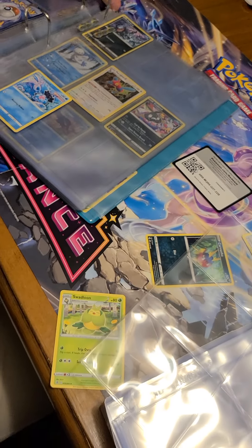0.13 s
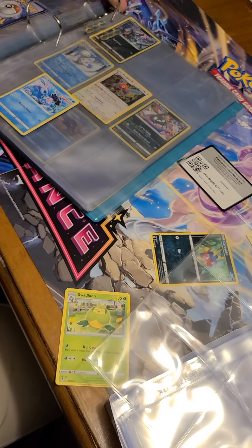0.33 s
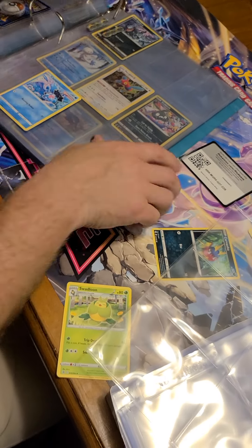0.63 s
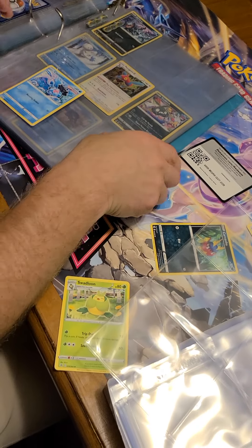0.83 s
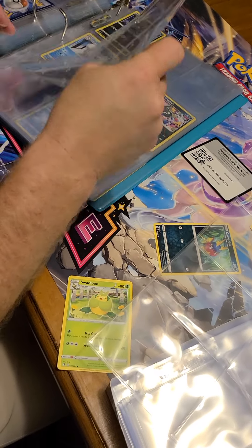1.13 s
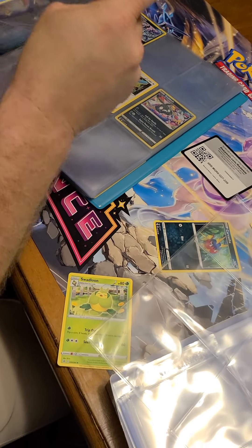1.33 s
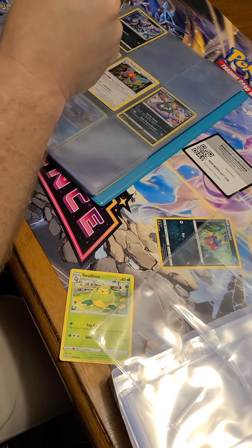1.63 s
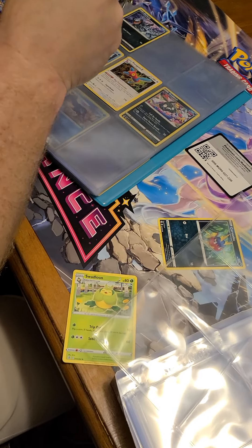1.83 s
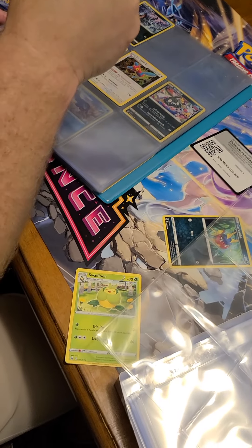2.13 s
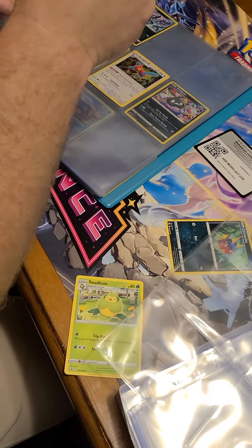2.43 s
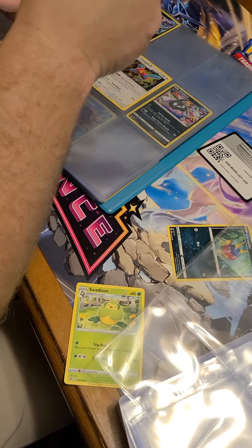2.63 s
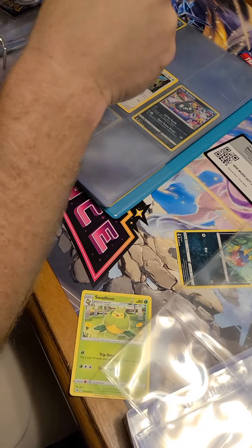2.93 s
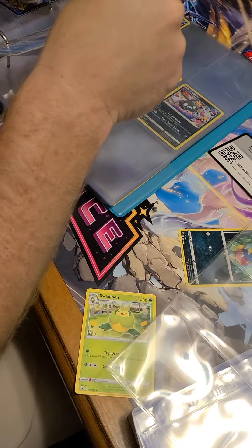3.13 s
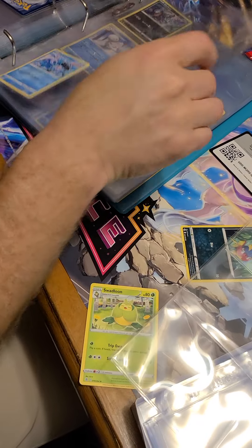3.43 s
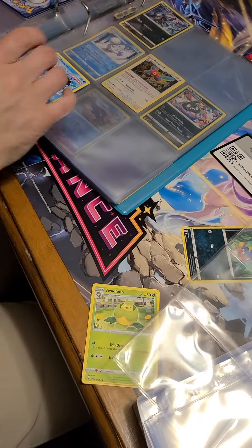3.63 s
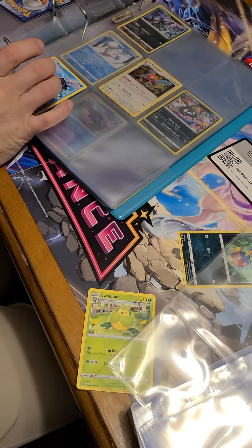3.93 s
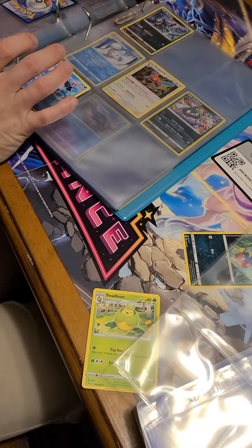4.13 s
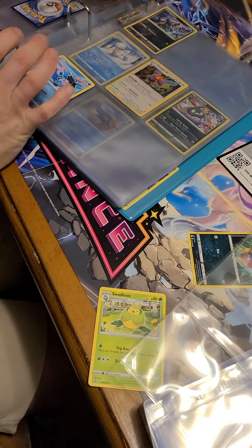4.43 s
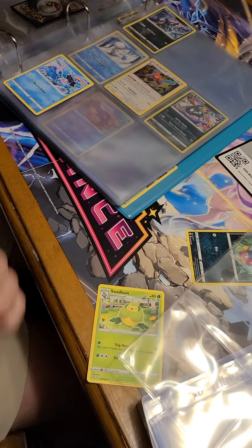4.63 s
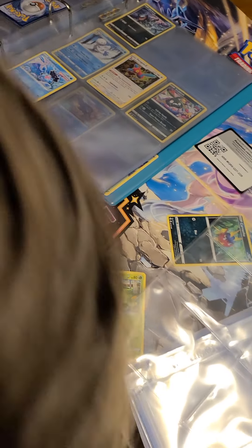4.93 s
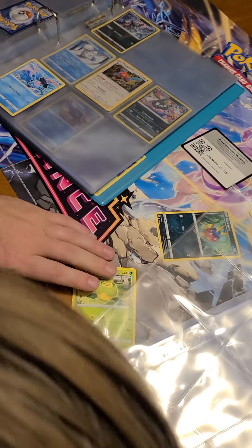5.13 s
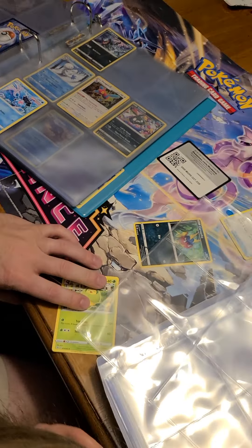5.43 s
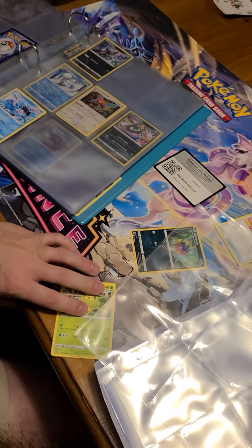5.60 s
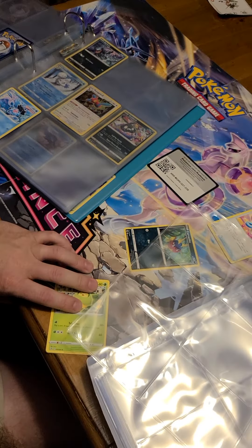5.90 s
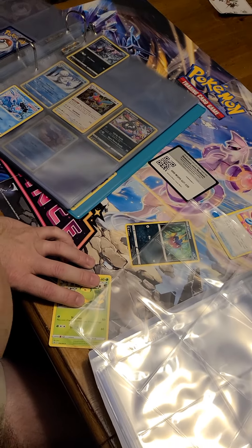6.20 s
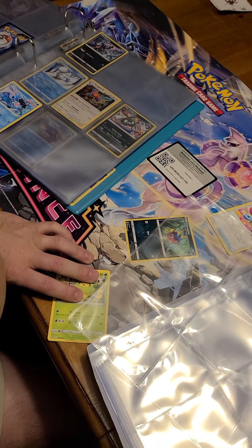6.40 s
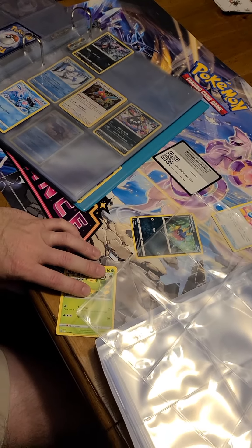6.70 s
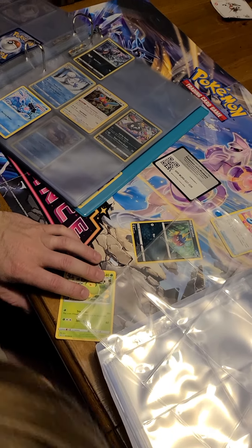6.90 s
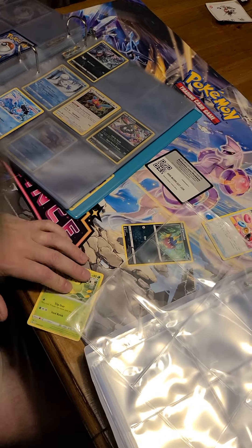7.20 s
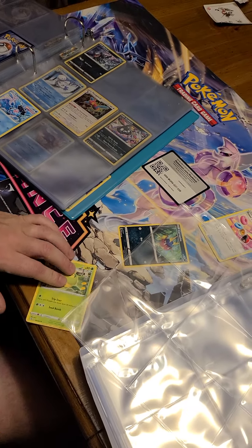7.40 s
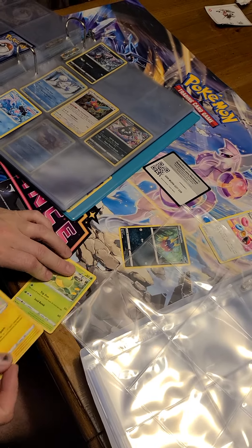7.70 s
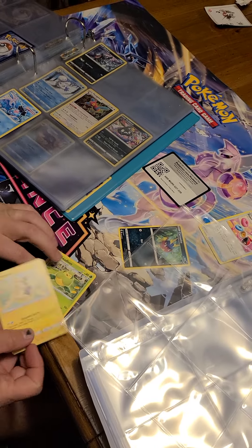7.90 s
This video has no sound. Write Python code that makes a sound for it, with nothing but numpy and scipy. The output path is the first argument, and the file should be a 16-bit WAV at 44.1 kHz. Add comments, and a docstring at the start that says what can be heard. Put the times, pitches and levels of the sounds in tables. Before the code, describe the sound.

Steel binder rings spring open with a loud clack, then snap shut, amid light taps and faint plastic rustling.

```python
"""A ring binder on a wooden table

Close by in a small room, steel rings spring open and thump the cover, a plastic page is eased onto
them, and they snap shut. Each impact excites the damped modes of spine, cover or table. Then fingers
tap the table and cards slide with stick-slip friction, over the low steady hum of a motor."""
import sys
import numpy as np
from scipy import signal
from scipy.fft import rfft, irfft, next_fast_len
from scipy.io import wavfile
from scipy.ndimage import uniform_filter1d, map_coordinates

SR = 44100
rng = np.random.default_rng(int(sys.argv[2]) if len(sys.argv) > 2 else 0)


def dump(signal):
    """Clip the signal to [-1, 1] and save it as 16-bit WAV at the path in sys.argv[1]."""
    limited = np.clip(np.atleast_2d(signal).T, -1, 1)
    pcm = np.round(limited * 32767).astype(np.int16)
    wavfile.write(sys.argv[1], SR, pcm)


N = 355093
SIZE = 24000  # samples in one short sound
T = np.arange(SIZE) / SR
HZ = np.fft.rfftfreq(SIZE, 1 / SR)


def rings():
    """Impact excitation: the sprung rings part or meet with a crack, and the spine vibrates freely."""
    # ring impacts: time_s, level_db, tilt_db_per_octave, spine_db, resonance_hz, resonance_db
    snaps = [(0.2393, -32.5, 2.5, -10.5, 5350, 8), (0.275, -19.5, 2.1, -12, 6270, 1.5),
             (0.278, -17.5, -1, -20, 4240, 12), (0.2805, -15, -8.5, -1.5, 810, 7.5),
             (4.343, -21, 1, 1, 820, 6), (4.3447, -11.5, -0.06, -0.45, 1360, 3)]
    # spectrum of steel striking steel: frequency_hz, density_db
    steel = [(100, -24), (300, -15), (550, -11), (820, -6), (1050, -14), (1380, -4), (1900, -8),
             (2700, -5.5), (4200, -11), (5200, -15.5), (7000, -20.5), (11500, -17.5), (16000, -27)]
    # modes of the steel spine: pitch_hz, level_db, t60_s
    spine_modes = [(352, -28, 0.36), (555, -23.5, 0.097), (820, -20, 0.2), (1118, -20, 0.23),
                   (1375, -12, 0.2), (1280, -18, 0.1), (1610, -20.5, 0.15), (2153, -23.5, .12),
                   (2704, -23.5, .1), (3190, -24.5, 0.16), (4400, -22.5, 0.19)]
    contact_s = .0008
    out = np.zeros((2, N))
    for s, db, tilt_db, spine_db, peak_hz, peak_db in snaps:
        tilt = amp(tilt_db * np.log2(np.clip(HZ, 700, SR) / 2000))
        impact = burst(contact_s)
        colour = unit(amp(along(steel, HZ)) * ripple(depth_db=3))
        crack = coloured(impact, colour * tilt * resonance(peak_hz, peak_hz / 7, peak_db))
        # a freely ringing spine throws more of the crack into the room
        crack = heard(crack, lag_ms=-.18, pan_db=0, room_db=2 + spine_db / 2)
        add(out, s - 3 * contact_s, amp(db + 21) * crack)
        spine = coloured(ring(spine_modes, scatter_db=1), tilt)
        add(out, s, amp(db + spine_db) * heard(spine, lag_ms=-.23, pan_db=1, room_db=-6.5))
    return out


def cover():
    """Modal vibration: the pressed lever makes the spine hum; recoil drums the cover on the table."""
    # spine modes excited by the lever: pitch_hz, level_db, t60_s
    lever_modes = [(340, -32.5, 0.67), (416, -46, 0.059)]
    # kicks of the spring on the cover: time_s, level_db, cutoff_hz
    kicks = [(0.2771, -6, 3980), (4.353, -25, 900.4)]
    # modes of the cover and the table under it: pitch_hz, level_db
    cover_modes = [(147, -24), (228, -18), (267, -19), (300, -21), (349, -14.5), (453, -15), (505, -5.5),
                   (545, -6.5), (584, -2.5), (668, -3), (724, -16), (843, -5), (910, -21.5), (1075, -23),
                   (1187, -15.5), (1378, -16.5), (1490, -25), (1575, -12.5), (1865, -18)]
    # decay of those modes: frequency_hz, t60_s
    cover_decay = [(150, .28), (228, .24), (267, .35), (350, .2), (505, .19), (584, .125), (720, .14),
                   (843, .11), (1100, .18), (1900, .16)]
    out = np.zeros((2, N))
    lever = heard(ring(lever_modes, scatter_db=2.5), lag_ms=-.12, pan_db=-1.5, room_db=-16)
    add(out, start_s=.2385, sound=lever)
    modes = [(hz, db, along(cover_decay, hz)) for hz, db in cover_modes]
    slap = -amp(-.5 - 60 * T / .018) * np.sin(2 * np.pi * 640 * T)  # the first, quickly damped swings
    for s, db, cutoff_hz in kicks:
        boom = coloured(ring(modes, scatter_db=2.5) + slap, 1 / (1 + (HZ / cutoff_hz) ** 2))
        add(out, s, amp(db) * heard(boom, lag_ms=-.22, pan_db=-2, room_db=-7.5))
    return out


def thuds():
    """Contact time limits bandwidth: a soft landing is a long push, so it excites only low pitches."""
    # landings of hand or binder: time_s, level_db, pitch_hz
    landings = [(0.315, -28, 175), (0.767, -37, 219), (4.352, -34.5, 140), (4.376, -29, 225),
                (4.38, -36, 71.2), (4.429, -39, 32.73), (4.652, -34, 74.6)]
    # spectrum of a landing: offset_from_pitch_octaves, density_db
    spectrum = [(-2.5, -12.5), (-0.5, -0.5), (0, -2), (-0.54, -5), (2.5, -31), (4, -63)]
    contact_cycles = .65
    out = np.zeros((2, N))
    for s, db, hz in landings:
        contact_s = contact_cycles / hz
        colour = amp(np.interp(np.log2((HZ + 1) / hz), *np.transpose(spectrum)))
        push = coloured(burst(contact_s), unit(colour))
        add(out, s - 3 * contact_s, amp(db + 22) * heard(push, lag_ms=-.045, pan_db=0, room_db=-2.5))
    return out


def taps():
    """Source and filter: contact chatter drives the table's resonances; harder contact is brighter."""
    # touches of fingers, sleeves and cards: time_s, level_db, hardness_db_per_octave, spot_hz
    contacts = [(0.801, -54, -0.5, 2200), (0.9505, -49.5, -4.5, 1780), (1.009, -47.5, -0.3, 1440),
                (1.074, -55, -17, 930), (1.1993, -32.5, -0.5, 1850), (1.211, -42.5, 0, 1560),
                (3.7647, -56, 8.5, 3140), (3.7745, -49, 7.5, 3170), (3.9419, -37, 4, 2650),
                (3.9987, -35, 1.6, 1340), (4.008, -40.5, -5, 624), (4.476, -42, 2, 965),
                (6.054, -53.5, -2, 2880), (6.161, -50.5, -6, 630), (6.2245, -51, -6.5, 1090),
                (6.563, -54.5, 5, 1700), (6.7122, -41, -9.5, 947), (7.149, -59, 1, 2970),
                (7.186, -52.5, -7, 640), (8.0109, -34.5, 0.5, 1030)]
    # resonances of the table: pitch_hz, width_hz, gain_db
    table_modes = [(457, 84, 10.5), (1034, 74, 4.5), (1810, 75, 1.5), (2860, 83, 0.5), (3180, 76, 5)]
    # spectrum of a tap of medium hardness: frequency_hz, density_db
    spectrum = [(100, -12), (550, -1), (1600, -2), (3900, -7.5), (7500, -25), (10500, -26.5),
                (14000, -32.5)]
    # direction of the touched spots, low ones to the right: spot_hz, left_minus_right_db
    directions = [(500, -4.5), (1000, -1.5), (1750, 1.5), (3000, 2)]
    attack_s, chatter_t60_s, pivot_hz = .0008, .016, 1592
    out = np.zeros((2, N))
    wood = np.prod([resonance(*mode) for mode in table_modes], axis=0)
    octaves = np.log2(np.clip(HZ, 400, SR) / pivot_hz)
    for s, db, hardness, spot_hz in contacts:
        bass_slope = .25 * hardness + 3 * np.log2(spot_hz / 900)  # harder or higher-pitched: less knock
        colour = amp(along(spectrum, HZ) + octaves * np.where(octaves > 0, hardness, bass_slope))
        chatter = rng.standard_normal(SIZE) * amp(-60 * T / chatter_t60_s) * (1 - np.exp(-T / attack_s))
        body = wood * resonance(spot_hz, width_hz=spot_hz / 3.63, db=7)
        tap = coloured(even(chatter, width_hz=600), body * colour)
        pan_db = along(directions, spot_hz)
        add(out, s, amp(db + 30.5) * heard(tap, lag_ms=-.068 * pan_db, pan_db=pan_db, room_db=1))
    return out


def sliding():
    """Stick-slip friction: sleeves and cards rub; a brief scraping hiss leads into each ring snap, and a long
    soft hiss trails after the closing snap."""
    # rubs, scrapes and the hiss after the closing snap: middle_s, half_length_s, level_db, fizz_over_rub_db
    strokes = [(0.0, 0.066, -55, -19), (0.263, 0.017, -38.5, -9.5), (0.995, .012, -58, -10.5),
               (1.125, 0.09, -61, -20), (1.496, 0.063, -65.5, -20), (2.139, 0.049, -60.5, -23),
               (3.534, 0.09, -59.5, -26), (4.344, 0.0096, -40, -2.5), (4.497, 0.3, -58.5, -18),
               (5.34, 0.11, -64, -21), (6.577, 0.017, -49, -23), (7.691, 0.055, -66.5, -1.5),
               (7.746, 0.019, -56, -19)]
    # spectrum of the rub: frequency_hz, density_db
    rub_spectrum = [(150, -8), (400, 1.5), (1300, -3.5), (3000, -12.5), (5500, -18.5), (8000, -42)]
    # spectrum of the fizz: frequency_hz, density_db
    fizz_spectrum = [(1500, -25.5), (4000, 6), (7500, -7.5), (11000, 0), (16000, -9)]
    catches_per_s, catch_db, catch_t60_s = 45, 7.5, .012
    t = np.arange(N) / SR
    rub_level, fizz_level = np.zeros(N), np.zeros(N)
    for s, half_length_s, db, fizz_db in strokes:
        stroke = amp(db) * np.exp(-.5 * ((t - s) / half_length_s) ** 2)
        rub_level += stroke
        fizz_level += amp(fizz_db) * stroke
    onsets = 1. * (rng.random(N) < catches_per_s / SR)
    catches = signal.fftconvolve(onsets, amp(-60 * T / catch_t60_s))[:N]
    grip = unit(amp(1.7 * wobble(45)))
    rub = unit(grip + amp(catch_db) * catches) * rub_level * diffuse(rub_spectrum, N)
    fizz = grip * fizz_level * diffuse(fizz_spectrum, N)
    return rub + fizz


def creases():
    """Buckling: a crease in a thin plastic sleeve flicks over with one high tick."""
    # flicks of a crease: time_s, level_db
    flicks = [(0.757, -71), (5.309, -63), (7.476, -68), (7.5044, -49.5)]
    # spectrum of a tick: frequency_hz, density_db
    spectrum = [(300, -34), (5500, -10), (8000, -16), (8900, 3), (10200, -7), (16000, -13)]
    out = np.zeros((2, N))
    for s, db in flicks:
        tick = coloured(burst(width_s=.00082), unit(amp(along(spectrum, HZ))))
        add(out, s - .0015, amp(db + 22) * heard(tick, lag_ms=.098, pan_db=-3, room_db=-10))
    return out


def background():
    """Line and continuous spectra: a motor's slightly unsteady tones over a low drone and faint hiss."""
    # partials of the motor: pitch_hz, level_db
    partials = [(59.3, -59), (74, -67), (120, -62.5), (148.5, -69.5), (240, -73.5), (379, -70.5)]
    # low room noise: frequency_hz, density_db
    drone_spectrum = [(15, -11.5), (40, -9), (55, -0.5), (78, 2), (100, -5.5), (140, -10), (190, -11),
                      (300, -10.5), (400, -11), (520, -27), (900, -74.5)]
    # faint steady hiss with a notch at 7-8.5 kHz: frequency_hz, density_db
    hiss_spectrum = [(240, -28), (400, -3.5), (470, -6.5), (750, -3.5), (1000, -9.5), (1500, -13.5),
                     (2300, -20), (3400, -19.5), (4900, -25), (6200, -30.5), (7200, -48), (8400, -46.5),
                     (9100, -39.5), (16000, -46.5)]
    t = np.arange(N) / SR
    hum = np.zeros(N)
    for hz, db in partials:
        level = np.sqrt(2) * amp(db + 3 * wobble(2.6))
        hum += level * np.sin(2 * np.pi * hz * t + .23 * wobble(.8))
    drone = amp(-56) * diffuse(drone_spectrum, N)
    hiss = amp(-61 + .5 * wobble(3.2)) * diffuse(hiss_spectrum, N)
    return (hum + drone) * amp([[-1.4], [1.2]]) + hiss * amp([[-.8], [.8]])


def heard(x, lag_ms, pan_db, room_db):
    """Direct plus reverberant field: the left ear hears the direct sound lag_ms after the right."""
    # reverberation of the small room: frequency_hz, t60_s
    room_decay = [(150, 0.45), (500, .25), (1400, .26), (4000, 0.18), (10000, .2), (16000, 0.081)]
    hz, t, noise = signal.stft(diffuse([(1, 0), (SR, 0)], SIZE), SR, nperseg=256)
    decay = amp(-60 * t / along(room_decay, hz)[:, None])
    tail = signal.istft(noise * decay, SR, nperseg=256)[1][:, :SIZE]
    build_up = 1 - np.exp(-(T / .0011) ** 2)  # the nearest walls answer after a few milliseconds
    tail = even(tail * build_up, width_hz=278.8)
    reverb = signal.fftconvolve(x[None], tail, axes=1)[:, :SIZE]
    delay_s = np.maximum([[lag_ms], [-lag_ms]], 0) / 1000
    direct = irfft(rfft(x) * np.exp(-2j * np.pi * HZ * delay_s))
    return (direct + amp(room_db) * reverb) * amp([[pan_db / 2], [-pan_db / 2]])


def diffuse(spectrum, size):
    """Diffuse field: noise from all sides is alike at the two ears in the bass, hardly in the treble."""
    # likeness of left and right: frequency_hz, correlation
    coherence = [(60, 0.82), (130, 1), (290, 0.9), (640, 0.28), (1410, -0.083), (3100, 0.092),
                 (6820, -0.12), (15000, 0.24)]
    m = next_fast_len(size, True)
    hz = np.fft.rfftfreq(m, 1 / SR)
    angle = np.arccos(np.clip(along(coherence, hz), -.9, .99)) / 2
    noise = rfft(rng.standard_normal((2, m))) * amp(along(spectrum, hz))
    mid, side = irfft(noise * [np.cos(angle), np.sin(angle)], m)[:, :size]
    return unit(np.array([mid + side, mid - side]))


def burst(width_s):
    """Noise pulse: tiny impacts under a Gaussian envelope that peaks three widths after the start."""
    envelope = np.exp(-.5 * (T / width_s - 3) ** 2)
    return even(rng.standard_normal(SIZE) * envelope, width_hz=.5 / width_s)


def ring(modes, scatter_db):
    """Superposition of damped modes; neighbours swing in opposite senses."""
    out = np.zeros(SIZE)
    for k, (hz, db, t60_s) in enumerate(modes):
        envelope = amp(db + scatter_db * rng.standard_normal() - 60 * T / t60_s)
        out += (-1) ** (k + 1) * envelope * np.sin(2 * np.pi * hz * T)
    return out


def resonance(hz, width_hz, db):
    """Resonance curve: one peak standing db above a flat response."""
    return 1 + (amp(db) - 1) / np.sqrt(1 + (2 * (HZ - hz) / width_hz) ** 2) ** 1.51


def ripple(depth_db):
    """Modal overlap: the gain of crowded high resonances, different for every point of contact."""
    peaks = uniform_filter1d(rng.standard_normal(len(HZ)), size=50)
    peaks = unit(uniform_filter1d(peaks, size=40))
    return amp(depth_db * peaks * HZ / (HZ + 1500))


def coloured(x, gain):
    """Minimum-phase filtering: a short sound passes through the causal filter with this gain."""
    cepstrum = irfft(np.log(np.maximum(gain, 1e-6)))
    cepstrum[..., 1:SIZE // 2] *= 2
    cepstrum[..., SIZE // 2 + 1:] = 0
    return irfft(rfft(x) * np.exp(rfft(cepstrum)))


def even(x, width_hz):
    """Whitening: x with energy near 1 and its spectrum levelled over bands of this width."""
    bins = max(int(width_hz * SIZE / SR), 1)
    power = np.abs(uniform_filter1d(np.abs(rfft(x)) ** 2, bins))
    return coloured(x, 1 / np.sqrt(power + 1e-12))


def wobble(rate_hz):
    """Random modulation: a smooth curve through rate_hz knots a second."""
    knots = rng.standard_normal(int(N * rate_hz / SR) + 4)
    return map_coordinates(knots, [np.arange(N) * rate_hz / SR])


def add(track, start_s, sound):
    """Superposition: a short sound joins the track, its far end faded out."""
    start = max(round(start_s * SR), 0)
    fade = np.minimum(1, 10 * (1 - T / T[-1])) ** 2
    track[:, start:start + SIZE] += (sound * fade)[:, :N - start]


def along(points, hz):
    """Interpolation of (frequency_hz, value) points on a logarithmic frequency axis."""
    frequencies, values = np.transpose(points)
    return np.interp(np.log(hz + 1), np.log(frequencies + 1), values)


def amp(db):
    """Decibels as an amplitude ratio."""
    return 10 ** (np.asarray(db) / 20)


def unit(x):
    """Normalisation to rms 1."""
    return x / np.sqrt(np.mean(np.abs(x) ** 2) + 1e-20)


def scene():
    """Superposition: the pressures from binder, hands and background add."""
    return rings() + cover() + thuds() + taps() + sliding() + creases() + background()


def record(dry):
    """Saturation and band limiting: peaks round off at full scale and the highest treble is cut."""
    cutoff_hz = 16100
    rounded = dry / (1 + dry ** 6) ** (1 / 6)
    m = next_fast_len(N + SIZE, True)
    low_pass = 1 / (1 + (np.fft.rfftfreq(m, 1 / SR) / cutoff_hz) ** 200)
    return irfft(rfft(rounded, m) * low_pass, m)[:, :N]


dry = scene()
out = record(dry)
dump(out)
```